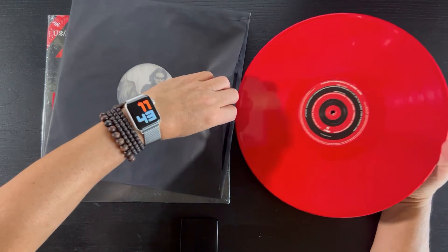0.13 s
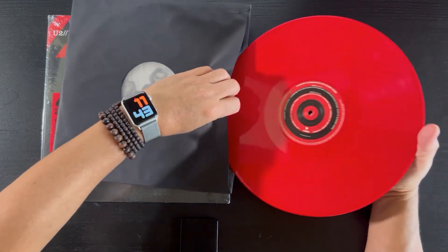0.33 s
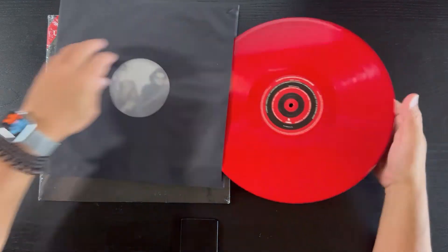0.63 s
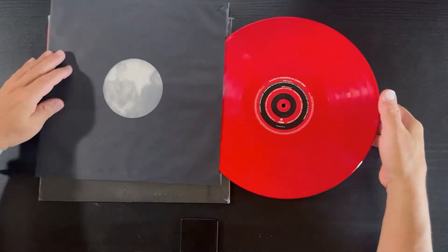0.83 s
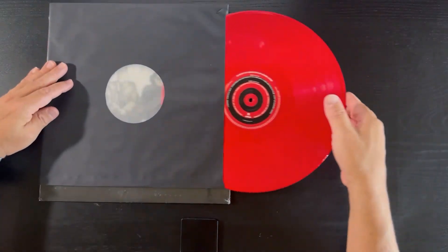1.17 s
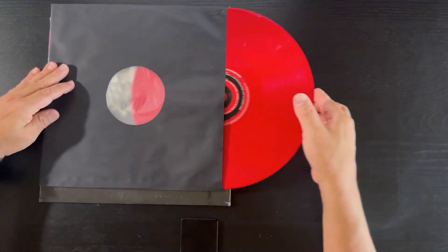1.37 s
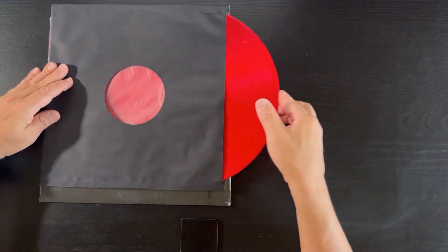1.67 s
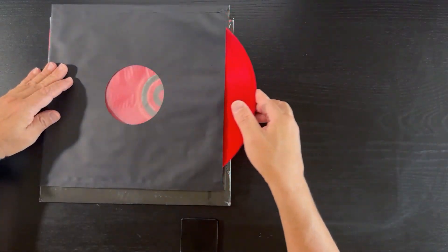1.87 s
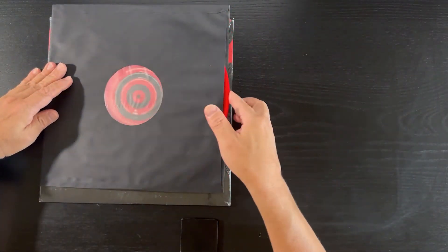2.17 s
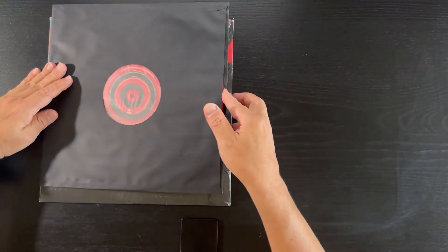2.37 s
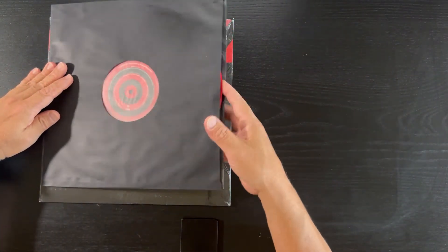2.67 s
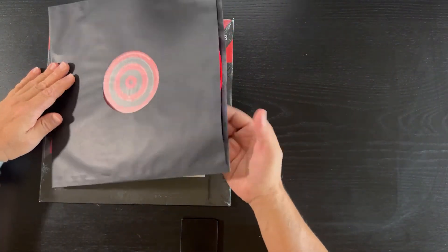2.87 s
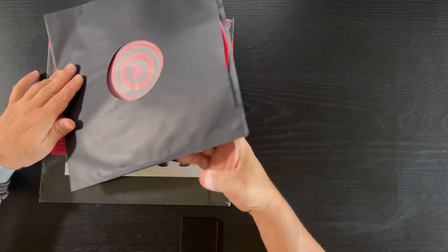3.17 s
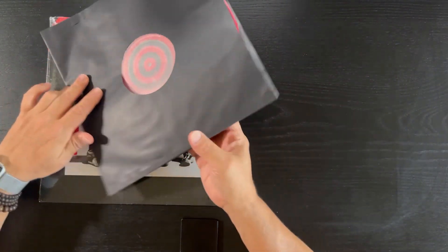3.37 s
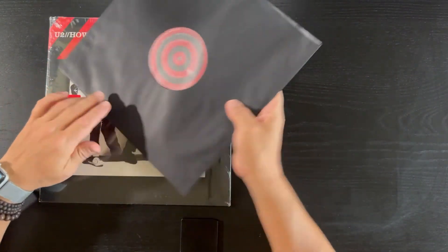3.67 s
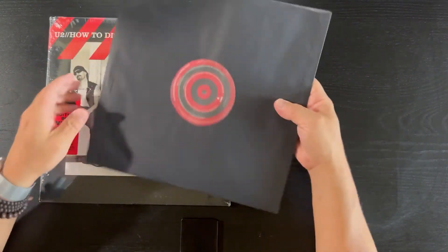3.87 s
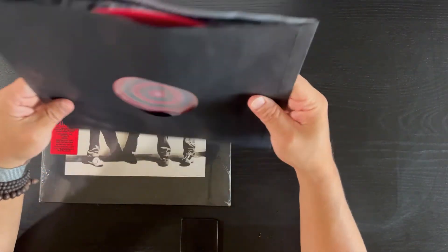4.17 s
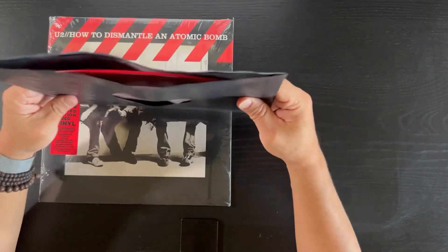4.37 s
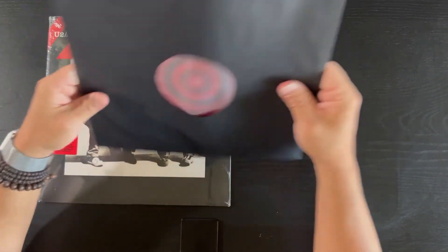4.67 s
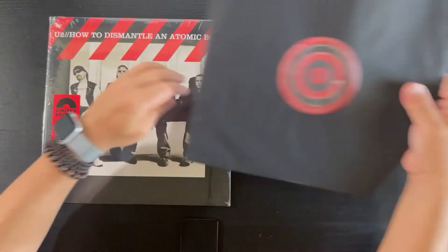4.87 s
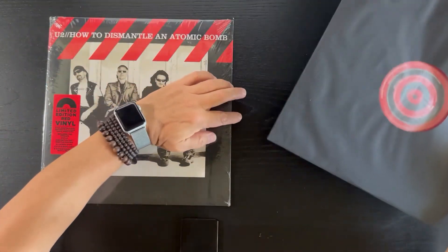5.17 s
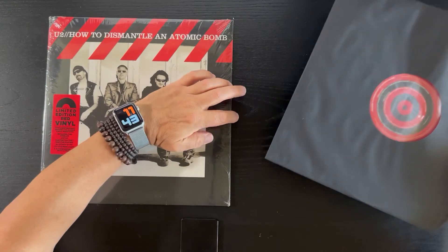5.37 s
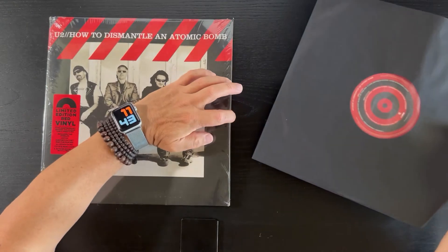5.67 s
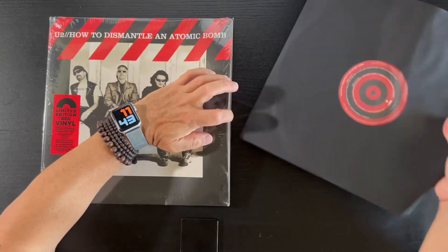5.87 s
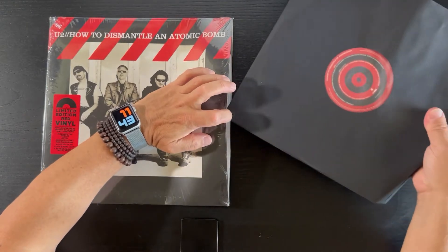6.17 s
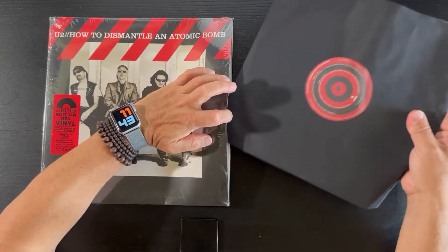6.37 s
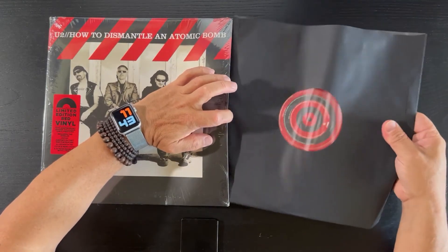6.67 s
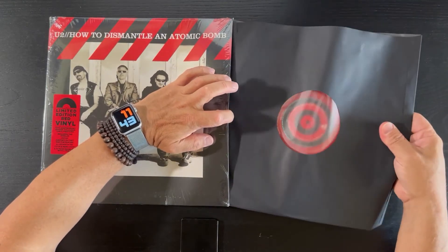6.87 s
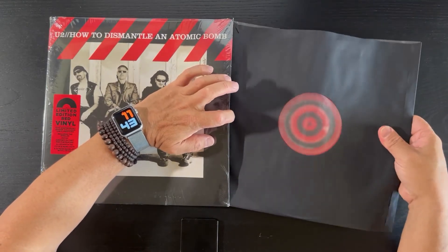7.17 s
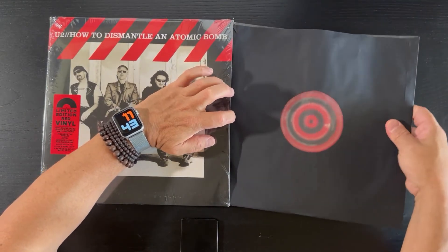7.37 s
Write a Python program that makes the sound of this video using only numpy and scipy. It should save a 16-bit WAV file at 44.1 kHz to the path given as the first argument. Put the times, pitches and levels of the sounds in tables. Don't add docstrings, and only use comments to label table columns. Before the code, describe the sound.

Hands drag a disc into its paper sleeve on an indoor table: bright hiss, sharp creases, hollow air-pocket pops and small panel ticks. The rubbing thins out, resumes as the sleeve turns, and peaks in a crumple with a low wobbling thump. After a quiet pause with a few tiny ticks, uneven scrapes and rustles follow at the jacket. Close microphone, short soft reflections, faint duct hum.

```python
import sys
import numpy as np
from scipy import signal
from scipy.fft import rfft, irfft
from scipy.io import wavfile
from scipy.ndimage import uniform_filter1d

SR = 44100
rng = np.random.default_rng(int(sys.argv[2]) if len(sys.argv) > 2 else 0)


def master_out(mix):
    frames = np.transpose(np.atleast_2d(mix))
    ceiling = np.clip(frames, -1, 1)
    pcm = np.round(ceiling * 32767).astype(np.int16)
    wavfile.write(sys.argv[1], SR, pcm)


def volts(x):
    e = np.asarray(x, float) / 20
    return 10 ** e


N = 331191
T = np.arange(N) / SR


def unit(x):
    return x / np.sqrt(np.mean(x ** 2))


def colour(x, table):
    hz, db = np.transpose(table)
    f = np.maximum(np.arange(x.shape[-1] // 2 + 1) * SR / x.shape[-1], 1)
    gain = volts(np.interp(np.log(f), np.log(hz), db))
    return irfft(rfft(x) * gain, x.shape[-1])


def ring(x, hz, width_hz):
    return signal.lfilter(*signal.iirpeak(hz, hz / width_hz, SR), x)


def walk(rate):
    k = int(SR / rate)
    steps = np.repeat(rng.standard_normal(N // k + 1), k)
    return unit(uniform_filter1d(uniform_filter1d(steps, k), k)[:N])


def grit(shape, spread_db):
    return rng.standard_normal(shape) * volts(spread_db * np.minimum(rng.exponential(size=shape), 6.5))


def broad(burst):
    spectrum = rfft(burst)
    power = uniform_filter1d(np.abs(spectrum) ** 2, size=len(burst) // 80)
    return irfft(spectrum / np.sqrt(power), len(burst))


def bend(t, hz, db, rise, t60):
    push = np.sin(np.pi / 2 * np.minimum(t / rise, 1)) ** 2
    fade = volts(-60 * np.maximum(t - rise, 0) / t60)
    return volts(db) * push * fade * np.sin(2 * np.pi * hz * t)


def pair(wide_db, make):
    return make() + volts(wide_db) * make() * np.array([[1], [-1]])


def pan(db):
    return volts(np.array([db, -db]) / 2)


def add(out, s, x):
    i = int(s * SR)
    out[:, i:i + x.shape[1]] += x[:, :N - i]


def hands(s):
    # (time [s], drag [dB], gloss: share of the drag on slick plastic [dB])
    opening = [(0, -55, -10), (.13, -63, -13), (.29, -58, -17)]
    feeding = [(.3, -50.5, -25), (.41, -39.5, -17.5), (.5, -59, -17.5), (.68, -61.5, -5.5),
               (.85, -61.5, -10.5)]
    sliding = [(.95, -62.5, -14), (1.26, -59.5, -15), (1.39, -65, -9), (1.65, -63, -13.5), (1.81, -62, -12),
               (1.94, -66.5, -6.5), (2.19, -68, -10), (2.52, -83.5, -8.5), (2.671, -83, -11)]
    turning = [(2.685, -73, -13), (2.725, -51, -25), (2.852, -61, -12.5), (3.103, -58.5, -17),
               (3.39, -60.5, -6), (3.607, -58, -11), (3.841, -65.5, -9), (4.055, -55, -8),
               (4.358, -71.5, 5)]
    tipping = [(4.38, -47, -6), (4.44, -49, -18.5), (4.58, -59.5, -5.5), (4.65, -52.5, -5),
               (4.758, -55.5, -15), (4.838, -70.5, -16), (4.93, -76, -17)]
    holding = [(4.999, -84.5, -12.5), (5.22, -78, -18.5), (5.411, -82, -17), (5.579, -86.5, -13.5),
               (6.46, -88, -14)]
    inserting = [(6.475, -63, -5.5), (6.526, -67, 0), (6.643, -48, -11.5), (6.686, -56.5, -13),
                 (6.966, -62.5, -23), (7.185, -63.5, -13), (7.51, -68.5, -10.5)]
    # (air pocket drone [dB], flexing [dB], crackle share [dB], left minus right [dB])
    grips = [
        (-69, -66.5, -21.5, -1.5),
        (-59.5, -63, -11.5, -2),
        (-65, -79, -16.5, -1.3),
        (-64, -60, -12.5, -1),
        (-63.5, -52.5, -12.5, -1.5),
        (-58.5, -62.5, -13, -2.5),
        (-61.5, -67, -10, -3),
    ]
    strokes = [opening, feeding, sliding, turning, tipping, holding, inserting]
    points = []
    for stroke, grip in zip(strokes, grips):
        points += [(*point, *grip) for point in stroke]
    times, *curves = np.array(points).T
    return [np.interp(s, times, curve) for curve in curves]


def hands_pan(s):
    return pan(hands(s)[-1])


def rubbing():
    # (pitch [Hz], level [dB])
    paper = [(300, -21.5), (900, -9.5), (2000, 2), (4000, 5.5), (6500, -0.5), (9000, -10.5), (16000, -54.5)]
    pocket = [(150, -14.5), (400, -11), (620, -12.5), (800, -12.5), (1000, -11.5), (1700, -9.5),
              (3000, -41.5)]
    sheen = [(5000, -9), (8000, -4), (11000, -4.5), (13500, -6), (16000, -8), (18000, -26)]
    flexing = [(100, -25), (190, 6.5), (300, -1), (450, 5.5), (800, -43)]
    # (middle [s], level [dB], length [s])
    hitches = [(0.178, -7, 0.044), (0.387, -5.5, .03), (0.537, -4.5, .04), (0.662, -7.5, 0.082),
               (0.863, -3.5, .05), (1.081, 5, 0.089), (1.293, -3, .05), (1.935, 2.5, 0.11),
               (2.108, -2.5, 0.1), (2.276, 4.5, 0.071), (2.386, -9, .06), (2.456, -3, .05),
               (2.787, -4, .08), (3.104, -5, .05), (3.483, -14.5, 0.067), (3.65, -5, 0.078),
               (3.791, 4, .04), (3.842, -9.5, 0.042), (3.934, -6.5, 0.019), (4.114, -2, .08),
               (4.284, -5.5, 0.079), (4.473, -3, .04), (4.663, -6, .04), (4.918, -10, 0.054),
               (6.514, 2, .05), (6.585, -13.5, .035), (6.609, 5, .04), (6.808, -10.5, 0.073),
               (6.856, 10, 0.0292), (7.006, 8, 0.04), (7.11, -6.5, 0.07), (7.257, 3, 0.016),
               (7.329, 8.5, 0.088), (7.48, -5.5, 0.029)]
    hiss_db, gloss_db, drone_db, flex_db, *_ = hands(T)
    sheen_db = hiss_db + gloss_db
    extra_db = hiss_db + 60.5
    drone_db = drone_db + 0.8 * extra_db
    flex_db = flex_db + 0.6 * extra_db
    hitch_db = sum(db * np.exp(-.5 * (3.3 * (T - s) / length) ** 2) for s, db, length in hitches)
    hiss_db = hiss_db + 0.72 * hitch_db
    sheen_db = sheen_db + hitch_db

    def layer(table, wide_db):
        noise = pair(wide_db, lambda: unit(colour(grit(N, 2.86), table)))
        return noise * volts(1.2 * walk(40))

    rub = volts(hiss_db - 5.5) * layer(paper, wide_db=0.5)
    rub = rub + volts(drone_db - 5.5) * layer(pocket, wide_db=-0.5)
    rub = rub + volts(sheen_db + 9.0) * layer(sheen, wide_db=-13.0)
    rub = rub + volts(flex_db - 7.0) * layer(flexing, wide_db=-10.0)
    return rub * volts(1.1 * walk(25)) * hands_pan(T)


def early_rms(x):
    return np.sqrt(np.mean(x[:int(.008 * SR)] ** 2))


def snaps():
    # (time [s], sheet [dB], brightness [octaves over 1 kHz], air pocket [dB], 60 dB fade [s])
    creases = [(.295, -30, 1.46, -50, 0.029), (.361, -40, 0.85, -73, 0.032),
               (.709, -44.5, 1.15, -43.5, 0.02), (1.017, -55.5, 1.0, -49, 0.032),
               (1.6, -47, 1.47, -56.5, 0.017), (2.676, -45.5, 0.59, -43.5, 0.093),
               (2.685, -37.5, 1.45, -37, 0.041), (2.889, -49, 1.34, -40.5, 0.049),
               (2.976, -38.5, 2.45, -50.5, 0.022), (3.064, -76, 0.36, -47.5, 0.015),
               (3.189, -47.5, 1.08, -50, 0.058), (3.286, -53, 1.15, -55, 0.043),
               (4.028, -48, 1.45, -44, 0.082), (4.369, -38, 0.95, -38.5, 0.031),
               (4.38, -43.5, 0.96, -41, 0.01), (4.669, -55.5, 0.82, -45.5, 0.096),
               (4.783, -54, 0.92, -56, 0.023), (5.47, -58.5, 0.97, -64, 0.096),
               (6.47, -57, 0.45, -61, 0.12), (6.55, -55.5, 1.17, -66, 0.04), (6.6, -46, 1, -66, 0.13),
               (6.668, -52, 1.65, -50.5, 0.059), (7.007, -54.5, 1.2, -50.5, 0.02),
               (7.034, -42.5, 1.25, -48, 0.018)]
    # (time [s], sheet [dB], brightness [octaves over 1 kHz], air pocket [dB])
    ticks = [(0.233, -64, 1.1, -62.5), (.552, -60.5, 0.41, -55), (.729, -56, 1.3, -80),
             (0.865, -62.5, 1.24, -62), (1.037, -62, 0.91, -63), (1.201, -60.5, 1.4, -76),
             (1.39, -65, 0.8, -70), (1.767, -63, 1.36, -96), (2.13, -64.5, 1.7, -60.5),
             (2.173, -67.5, 1.4, -69), (2.349, -69, 1.36, -69), (3.174, -59, 1.2, -56),
             (3.267, -61, 1.4, -50.5), (3.573, -62, 1.2, -74), (4.185, -56, 1.25, -54.5),
             (4.75, -56.5, 1.6, -52), (5.135, -70.5, 0.36, -65), (5.225, -67, 0.31, -66.5),
             (5.26, -57.5, 0.15, -64.5), (6.873, -55.5, 1.04, -54.5), (7.183, -60, 1, -59.5)]
    # (time [s], air pocket [dB])
    pops = [
        (0.681, -47.5),
        (3.125, -51.5),
        (3.141, -52),
        (3.236, -52),
        (3.377, -53),
        (3.954, -56),
        (4.693, -50.5),
        (6.751, -51),
        (7.265, -59.5),
        (7.346, -55.5),
    ]
    # (low [Hz], high [Hz])
    parts = [(520, 1100), (1100, 2100), (2100, 4200), (4200, 9000), (9000, 16000)]
    rows = creases + [(*tick, .032) for tick in ticks]
    rows = rows + [(s, db - 13.5, 0.3, db, 0.022) for s, db in pops]
    octaves = np.log2(np.sqrt(np.prod(parts[1:], axis=1)) / 1000)
    out, t = np.zeros((2, N)), T[:6000]
    for (s, sheet_db, bright, pocket_db, t60), noise in zip(rows, grit((len(rows), len(t)), 1.5)):
        volley = volts(-60 * t / max(t60, .004))
        crack = 0.5 * np.exp(-t / 0.0002)
        burst = broad(noise * np.minimum(t / 0.00094, 1) * (volley + crack))
        hz = 1000 * 2 ** bright
        burst = burst + .6 * (ring(burst, hz, 330) + ring(burst, hz * 1.45, 330))
        away = octaves - bright
        fade_db = np.where(away > 0, 10 * away, -6.5 * away)
        belly = ring(ring(burst, 321.5, 220), 321.5, 270)
        x = volts(pocket_db - 10) * belly / early_rms(belly)
        stiff = signal.sosfilt(signal.butter(3, .75 * hz, "highpass", fs=SR, output="sos"), burst)
        for (lo, hi), db in zip(parts, [pocket_db, *(sheet_db + 2.0 - fade_db)]):
            band = signal.butter(2, [lo, hi], "bandpass", fs=SR, output="sos")
            loose = signal.sosfilt(band, burst)
            part = signal.sosfilt(band, stiff if lo > 1000 else burst)
            x = volts(db) * part / early_rms(loose) - x
        add(out, s, np.outer(hands_pan(s), x))
    return out


def sheet_sound(burst, hz, pocket_db, edge_db, tone):
    # (pitch [Hz], level [dB])
    edge = [(1200, -14), (3500, 0), (7000, -3), (16000, -18)]
    burst = broad(burst)
    body = burst + sum(.6 * ring(burst, hz * 2 ** (.5 * u), 350) for u in tone)
    body = ring(ring(body, hz, 1.1 * hz), hz, 1.6 * hz)
    low = ring(ring(burst, 770 * 2 ** (.12 * tone[0]), 800), 900, 1300)
    bright = unit(colour(burst, edge))
    return unit(body) + volts(pocket_db + 2) * unit(low) + volts(edge_db + 5.5) * bright


def rustles():
    # (middle [s], level [dB], centre [Hz], length [s], air pocket share [dB])
    folds = [(0.331, -62, 3230, 0.062, -3), (0.421, -36.5, 2370, 0.014, -4),
             (0.494, -56, 2240, 0.035, -1.5), (0.719, -53.5, 2355, 0.062, -1.5),
             (0.82, -64, 1690, 0.032, 8.5), (1.624, -60.5, 4370, 0.07, -7), (2.704, -50.5, 2550, 0.017, -5),
             (2.998, -53, 3740, 0.043, -19), (3.431, -66.5, 1550, 0.012, 9), (3.531, -45, 2370, 0.018, -1),
             (3.9, -78, 1570, 0.044, 15), (4.03, -58.5, 2000, 0.013, 4), (4.074, -53, 1900, 0.013, -5),
             (4.397, -46.5, 2540, 0.033, -0.5), (4.641, -56.5, 3030, 0.016, 0), (5.4, -76, 3400, 0.02, -15),
             (5.477, -54.5, 2430, 0.017, -9.5), (5.865, -81.5, 1560, 0.11, -15),
             (6.503, -61, 2020, 0.034, 4.5), (6.629, -47.5, 2500, 0.022, 3.5),
             (6.706, -60.5, 2400, 0.045, -20), (6.857, -58, 2860, 0.029, -4),
             (7.326, -57.5, 1810, 0.017, -2), (7.385, -63, 2540, 0.097, -0.5)]
    out, t = np.zeros((2, N)), T[:12000] - T[6000]
    noise = grit((len(folds), len(t)), 3.3)
    tones = rng.uniform(-1.4, 1, (len(folds), 2))
    clumps = np.repeat(rng.standard_normal((len(folds), 80)), 150, axis=1)
    for (s, db, hz, length, pocket_db), n, clump, tone in zip(folds, noise, clumps, tones):
        swell = np.exp(-.5 * (2 * t / length) ** 2)
        slips = n * swell * volts(np.clip(4.6 * clump, -7, 4))
        x = sheet_sound(slips, hz, pocket_db, edge_db=-12, tone=tone)
        x = x * volts(db) * np.sqrt(np.mean(swell ** 2))
        add(out, s + t[0], np.outer(hands_pan(s), x))
    return out


def crackle():
    scratch_hz = [700, 1300, 2400]
    drag_db, *_, share_db, _ = hands(T)
    out = 0
    for hz in scratch_hz:
        sizes = volts(3 * np.minimum(rng.exponential(size=N), 3))
        slips = (rng.random(N) < 170 / SR) * sizes
        fading = signal.lfilter([1], [1, -np.exp(-1 / (.002 * SR))], slips)
        scratch = fading * rng.standard_normal(N)
        out = out + unit(ring(ring(scratch, hz, 0.37 * hz), hz, 1.0 * hz))
    return out * volts(drag_db + share_db) * hands_pan(T)


def pings():
    # (start [s], pitch [Hz], peak [dB])
    flicks = [(0.2967, 1290, -24), (0.295, 5050, -31.5), (.2968, 6600, -27.5), (.2975, 2060, -31),
              (.309, 5000, -27.5), (0.308, 2440, -40.5), (.317, 875, -40), (0.322, 1660, -37),
              (.361, 734, -51), (0.3627, 4050, -40), (0.363, 1780, -31), (0.382, 1850, -43),
              (0.408, 2900, -32), (0.4164, 1300, -30), (0.417, 1910, -28.5), (0.419, 4690, -34),
              (.431, 720, -37.5), (.4435, 2110, -47), (.685, 750, -43), (.722, 970, -39),
              (1.6006, 2520, -28), (1.601, 3580, -31), (2.685, 1690, -25.5), (2.6905, 4600, -33.5),
              (2.696, 2430, -31), (2.6865, 962, -27.5), (2.7325, 715, -39), (2.743, 1720, -45),
              (2.9763, 2800, -30.5), (2.9773, 4080, -29.5), (2.9795, 800, -36.5), (3.1246, 850, -38.5),
              (3.1755, 2410, -53), (3.189, 2740, -30), (3.5223, 990, -40), (3.523, 2600, -29),
              (3.5315, 2200, -33), (3.538, 1060, -40), (3.559, 2130, -42), (3.5745, 2130, -41),
              (4.033, 1610, -36.5), (4.0416, 1170, -37), (4.056, 2090, -38.5), (4.369, 1030, -31),
              (4.37, 3120, -33.5), (4.3695, 2150, -32), (4.3788, 1240, -24), (4.395, 1750, -35.5),
              (2.8915, 624, -38.5), (4.402, 1383, -32.5), (4.692, 895, -34.5), (4.785, 2770, -37),
              (6.613, 4300, -41), (6.6145, 2150, -42), (6.627, 1410, -29), (6.638, 586, -37.5),
              (6.67, 705, -39.5), (6.754, 715, -39), (7.0405, 740, -37), (7.347, 780, -40.5)]
    # (start [s], pitch [Hz], peak
    # [dB])
    creeps = [(.118, 3060, -48.5), (2.135, 1600, -56), (2.178, 1390, -55.5), (2.269, 2840, -54),
              (2.278, 5370, -61), (2.446, 802, -64), (2.474, 855, -59.5), (2.5, 747, -56),
              (2.528, 750, -55.5), (2.552, 695, -57.5), (3.909, 1040, -57), (5.261, 1940, -46),
              (5.26, 2680, -49), (5.26, 4200, -61), (6.836, 1400, -46), (5.47, 1980, -42),
              (5.478, 1375, -44), (6.553, 1360, -45.5), (6.604, 3300, -45), (6.623, 4330, -47),
              (6.666, 3700, -47), (7.036, 4760, -38), (7.186, 2370, -51), (7.277, 840, -50),
              (7.412, 785, -47.5), (.297, 804, -35), (0.7304, 2800, -37), (1.601, 2240, -45),
              (1.6015, 4140, -36), (2.691, 467, -44), (3.064, 1044, -41), (3.287, 2100, -50),
              (3.526, 3130, -35), (4.786, 2000, -36.5), (4.783, 3700, -47), (5.136, 1440, -53),
              (5.137, 2300, -57), (5.217, 1204, -58), (7.036, 1990, -28.5), (7.035, 2880, -36)]
    out, t = np.zeros((2, N)), T[:2500]
    for s, hz, db in flicks + creeps:
        t60 = .018 * (hz / 1000) ** -.7
        add(out, s, np.outer(hands_pan(s), bend(t, hz, db, .001, t60)))
    return out


def brushes():
    # (middle [s], pitch [Hz], rms level [dB], length [s])
    touches = [(0.019, 700, -67, 0.033), (0.121, 1500, -67, 0.086), (0.128, 5000, -65.5, .04),
               (.303, 800, -41, 0.014), (0.957, 700, -66.5, 0.084), (1.26, 750, -63.5, 0.087),
               (1.605, 2200, -56, 0.0079), (2.279, 750, -70.5, .08), (2.41, 11000, -71.5, 0.0193),
               (2.832, 750, -59, 0.078), (2.892, 11000, -50.5, .008), (2.983, 1900, -47.5, 0.016),
               (2.998, 750, -58.5, 0.057), (3.075, 1300, -62, 0.035), (3.196, 1300, -46, 0.013),
               (3.29, 3200, -71, .012), (3.527, 1500, -44.5, .025), (3.73, 2700, -65, .05),
               (3.813, 650, -65, 0.17), (3.92, 750, -57, 0.045), (4.004, 650, -57, 0.093),
               (4.253, 650, -65.5, 0.052), (4.536, 750, -53.5, 0.027), (4.791, 2600, -54, 0.01),
               (4.813, 12000, -76, .02), (4.875, 11000, -77, .015), (4.889, 1800, -71.5, .14),
               (5.201, 14000, -85.5, .04), (5.475, 12000, -62.5, 0.022), (5.545, 6000, -77.5, .05),
               (5.7, 12000, -80.5, 0.015), (5.868, 1500, -74, 0.13), (6.5, 7000, -53, 0.016),
               (6.555, 3000, -52, .012), (7.044, 2600, -48, 0.012), (7.196, 750, -65, 0.028),
               (7.319, 1000, -55.5, 0.018)]
    out, t = np.zeros((2, N)), T[:9000] - T[4500]
    for (s, hz, db, length), n in zip(touches, grit((len(touches), 2, len(t)), 3)):
        noise = n[0] + .5 * n[1] * np.array([[1], [-1]])
        width_hz = 0.63 * hz
        x = unit(ring(ring(noise, hz, width_hz), hz, 2 * width_hz))
        x = x * volts(db) * np.exp(-.5 * (2.5 * t / length) ** 2) * hands_pan(s)[:, None]
        skip = max(int(-(s + t[0]) * SR) + 1, 0)
        add(out, s + t[skip], x[:, skip:])
    return out


def whistles():
    # (start [s], end [s], pitch [Hz], width [Hz], level [dB])
    gaps = [
        (1.003, 1.444, 870, 222, -63),
        (1.562, 2.084, 850, 215, -68.5),
        (2.412, 2.636, 689, 300, -75.5),
        (3.65, 3.947, 1910, 300, -65),
        (7.04, 7.13, 2040, 260, -59),
        (6.877, 7.5, 720, 197, -66.5),
    ]
    out = 0
    for start, end, hz, width_hz, db in gaps:
        swell = np.sin(np.pi * np.clip((T - start) / (end - start), 0, 1)) ** .5
        pulses = volts(4.5 * walk(70))
        hiss = unit(ring(ring(grit(N, 1.3), hz, width_hz), hz, 2 * width_hz))
        out = out + volts(db - 2.5) * pulses * swell * hiss
    return out * hands_pan(T)


def flop():
    # (start [s], pitch [Hz], peak [dB], rise [s], 60 dB fade [s])
    bends = [
        (4.372, 518.3, -27.5, 0.013, 0.08),
        (4.38, 425, -29.5, 0.017, 0.033),
        (4.386, 337, -25.5, 0.0095, 0.089),
        (4.386, 124.5, -19, 0.023, 0.21),
        (4.391, 274.5, -21.5, 0.015, 0.055),
        (4.391, 198.3, -26, 0.012, 0.1),
        (4.4, 72.9, -21.5, 0.026, 0.15),
        (4.445, 66.6, -32.5, 0.076, 0.13),
    ]
    # (start [s], pitch [Hz], peak
    # [dB], 60 dB fade [s])
    nudges = [(.7, 206, -49.5, 0.084), (0.858, 123.4, -43.5, 0.36), (0.86, 224, -46.5, 0.034),
              (0.866, 413, -51.5, 0.022), (0.912, 131, -46, 0.19), (0.913, 300, -48.5, 0.039),
              (3.075, 297, -48, 0.083), (4.034, 142, -39.5, 0.055), (4.036, 450, -42, 0.042),
              (4.046, 268, -43.5, 0.042), (4.635, 463, -44, 0.057), (4.774, 420, -46, 0.028)]
    out, t = np.zeros((2, N)), T[:16000]
    for s, hz, db, rise, t60 in bends + [(s, hz, db, 0.014, t60) for s, hz, db, t60 in nudges]:
        add(out, s, np.outer([1, 1], bend(t, hz, db, rise, t60)))
    return out


def room(x):
    # (pitch [Hz], 60 dB fade [s])
    fades = [(200, 0.27), (1000, 0.39), (4000, 0.063), (12000, 0.49)]
    fade_hz, fade_s = np.transpose(fades)
    t, tail = T[:20000], 0
    for hz in 125 * 2. ** np.arange(8):
        t60 = np.interp(np.log(hz), np.log(fade_hz), fade_s)
        wide_db = 6.5 - 6 * abs(np.log2(hz / 2000))
        octave = pair(wide_db, lambda: ring(rng.standard_normal(len(t)), hz, 1.14 * hz))
        tail = tail + octave * volts(-60 * t / t60)
    tail = tail * np.clip((t - .002) / 0.0023, 0, 1)
    tail = tail * volts(-5) / np.sqrt(np.sum(tail ** 2) / 2)
    return signal.fftconvolve(x.mean(0)[None], tail, axes=1)[:, :N]


def ventilation():
    # (time [s], level [dB])
    draught = [(0.0, -63), (1.02, -62), (1.17, -52.5), (1.44, -66), (1.67, -65), (2.03, -58.5), (3.03, -59),
               (3.16, -62.5), (3.6, -61), (3.93, -59.5), (4.48, -56), (4.83, -61.5), (5.23, -58.5),
               (5.85, -65.5), (6.071, -55), (6.44, -65.5), (6.88, -58), (7.51, -62.5)]
    # (pitch [Hz], level [dB])
    rumble = [(15, -28.5), (30, -3), (80, 4), (140, -2.5), (260, -10), (420, -18.5), (750, -39.5),
              (2000, -44), (8000, -64), (16000, -60.5)]

    def tone(hz, width_hz):
        x = unit(ring(ring(rng.standard_normal(N), hz, width_hz), hz, 2 * width_hz))
        swing = np.sqrt(uniform_filter1d(x ** 2, int(.08 * SR)))
        return unit(x / (0.87 + swing))

    duct = volts(np.interp(T, *np.transpose(draught)) + 4.5) * tone(hz=58.3, width_hz=4)
    overtone = volts(-63.5 + 2.5 * walk(6.7)) * tone(hz=120, width_hz=1.6)
    floor = volts(-61.5) * pair(-5.5, lambda: unit(colour(rng.standard_normal(N), rumble)))
    return duct + overtone + floor


def scene():
    near = snaps() + rustles() + crackle()
    flicks, disc = pings(), flop()
    echoes = room(near + volts(-9) * flicks + volts(-1.5) * disc)
    return rubbing() + near + flicks + brushes() + whistles() + disc + echoes + ventilation()


def low_pass(x):
    return signal.sosfilt(signal.butter(12, 16490, fs=SR, output="sos"), x)


def record(dry):
    # (pitch [Hz], left ahead of right [radians])
    port_lead = [(0, 0), (1720, 0.2), (3100, -0.9), (4310, -0.9), (5770, 0.2), (6980, -0.4), (8180, 1.3),
                 (9040, 3.1), (9910, 3.3), (11600, 6.3), (12300, 6.4), (13900, 9.3), (14800, 9.5),
                 (16000, 11.7)]
    # (pitch [Hz], left minus right [dB])
    port_lean = [(700, 0), (3000, .9), (5500, -2), (9000, 1.3)]
    f = np.arange(N // 2 + 1) * SR / N
    lead = np.interp(f, *np.transpose(port_lead))
    turn = np.exp(.5j * lead * np.array([[1], [-1]])) * pan(np.interp(f, *np.transpose(port_lean)))
    both = rfft(dry)
    middle = both.mean(0)
    both = middle + (both - middle) * (f / np.hypot(f, 105)) ** 2
    heard = irfft(both * turn * (f < 15850), N)
    hiss = volts(-97) * rng.standard_normal(dry.shape)
    return low_pass(heard + hiss)


dry = scene()
out = record(dry)
master_out(out)
```